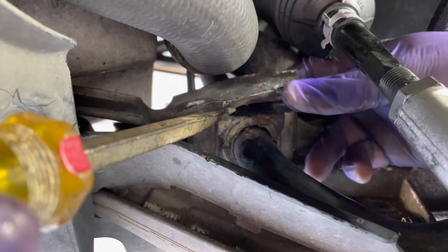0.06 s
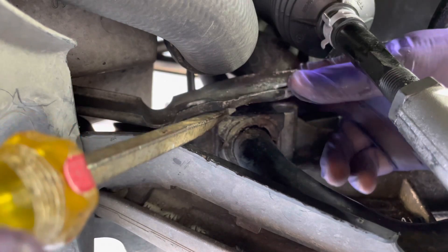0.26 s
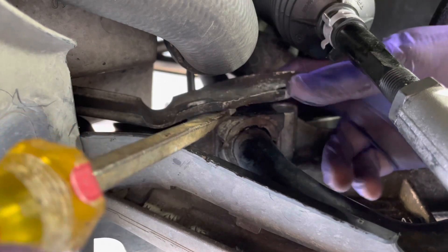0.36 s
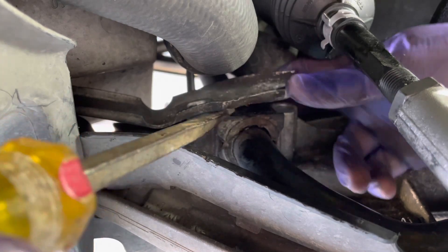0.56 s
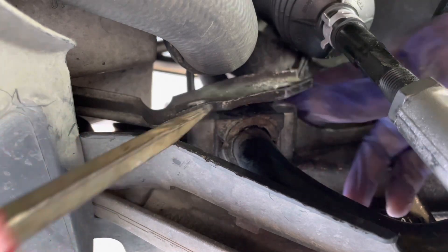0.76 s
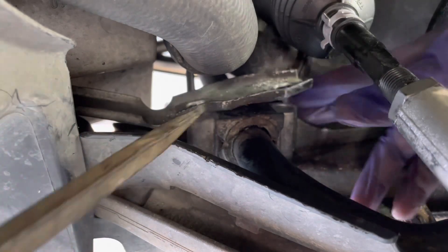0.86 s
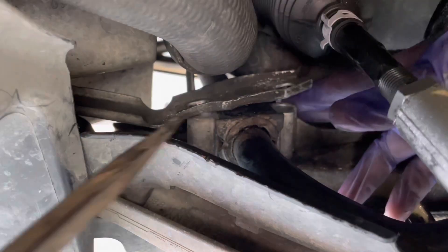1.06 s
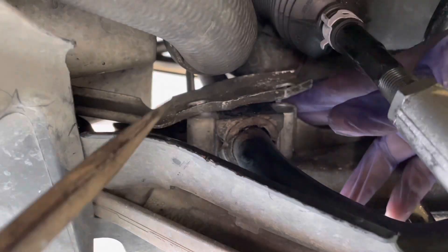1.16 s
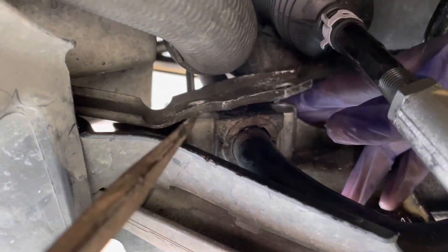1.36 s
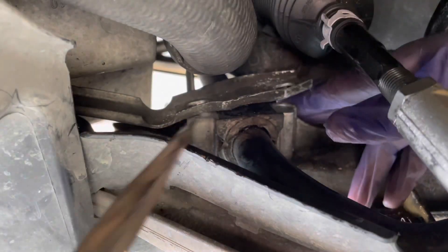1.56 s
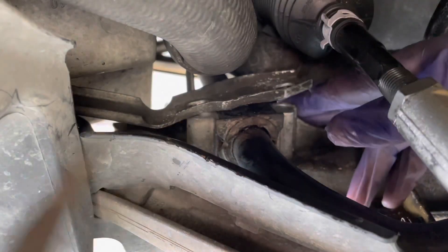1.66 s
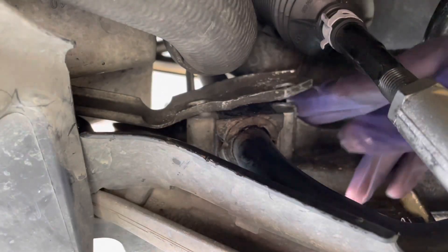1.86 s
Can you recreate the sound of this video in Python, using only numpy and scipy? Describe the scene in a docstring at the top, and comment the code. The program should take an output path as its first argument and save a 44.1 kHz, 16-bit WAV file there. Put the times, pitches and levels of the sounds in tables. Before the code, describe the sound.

A screwdriver levers a steel bar under a car: faint ticks, a cluster of clacks, a short squealing scrape, then a harder ringing knock and quiet rustling, heard close in a garage with handling rumble.

```python
"""Under a car in a garage, a screwdriver levers a steel sway bar against its bracket, close to the microphone.
The tip ticks and pings as it seats, slips with damped clacks of filtered noise, and knocks ring the bar's modes.
It scrapes along the bar: random jerks excite the blade's resonances under a wavering squeal, with an edge hiss.
The suspension thuds in sagging low tones; grit and a gloved hand rustle as showers of tiny impulses.
The shaken microphone rumbles over quiet room noise, and the garage answers with a faint noise-like tail."""
import sys
import numpy as np
from scipy import signal
from scipy.fft import rfft, irfft, next_fast_len
from scipy.io import wavfile
from scipy.ndimage import map_coordinates

SR = 44100
rng = np.random.default_rng(int(sys.argv[2]) if len(sys.argv) > 2 else 0)


def wrap_up_sound(samples):
    """Save the sound to the file named by the first command line argument, as 16-bit audio."""
    columns = np.atleast_2d(samples).T
    # keep every value between -1 and 1, then stretch to whole-number steps
    tamed = np.clip(columns, -1, 1)
    steps = np.round(tamed * 32767).astype(np.int16)
    wavfile.write(sys.argv[1], SR, steps)


N = 83790  # length in samples


def amp(db):
    """Decibels to gain."""
    return 10 ** (np.asarray(db) / 20)


def unit(x):
    """x at rms 1."""
    return x / np.sqrt(np.mean(x ** 2) + 1e-20)


def along(points, hz):
    """Values at hz from (Hz, value) points, interpolated on a log frequency axis."""
    f, v = np.transpose(points)
    return np.interp(np.log(hz + 1), np.log(f + 1), v)


def curves(rows):
    """One value per sample for each column after the time; the end values hold."""
    s, *cols = np.transpose(rows)
    return [np.interp(np.arange(N) / SR, s, c) for c in cols]


def wobble(rate):
    """A smooth random curve, rate knots a second."""
    knots = rng.standard_normal(N)
    return map_coordinates(knots, [np.arange(N) * rate / SR], mode="mirror")


def filtered(x, response):
    """x times a response of frequency."""
    m = next_fast_len(len(x) + 8192)  # padding keeps the filter's tail from wrapping round
    spectrum = rfft(x, m) * response(np.fft.rfftfreq(m, 1 / SR))
    return irfft(spectrum, m)[:len(x)]


def coloured(x, spectrum):
    """x filtered by the given spectrum, at rms 1."""
    return unit(filtered(x, lambda hz: amp(along(spectrum, hz))))


def dying(x, t60s):
    """Each frequency of x fades at its own speed, by 60 dB in its t60."""
    hz, t, z = signal.stft(x, SR, nperseg=128)
    fade = amp(-60 * t / along(t60s, hz)[:, None])
    return signal.istft(z * fade, SR)[1][:len(x)]


def slips(rate, spread_db):
    """Irregular tiny impulses of uneven strength and random sign, on average rate a second."""
    happens = rng.random(N) < rate / SR
    strength = amp(spread_db * rng.standard_normal(N).clip(-2, 2))
    return happens * strength * rng.choice([-1, 1], N)


def add(track, s, sound):
    """Mix a sound in at time s."""
    part = track[max(0, round(s * SR)):][:len(sound)]
    part += sound[:len(part)]


def mode(hz, t60):
    """One damped vibration: a sine that decays by 60 dB in t60 seconds."""
    t = np.arange(SR // 2) / SR
    return np.exp(-np.log(1000) * t / t60) * np.sin(2 * np.pi * hz * t)


def room_noise():
    """Steady, low-heavy noise of the garage around the microphone."""
    # room noise spectrum: (frequency [Hz], relative level [dB])
    floor_colour = [(24, -37), (40, 4.5), (317, -17.5), (650, -26), (1310, -29), (2270, -43), (15500, -54)]
    floor_db = -55
    return amp(floor_db) * coloured(rng.standard_normal(N), floor_colour)


def microphone_shake():
    """Handling of the microphone moves it bodily: very low noise whose level swells and sinks."""
    # shake over time: (time [s], level [dB])
    shake = [(0, -43.5), (.25, -40.5), (.35, -26), (.48, -26.5), (.68, -31), (.95, -39), (1.2, -45),
             (1.45, -40), (1.9, -47)]
    # shake spectrum: (frequency [Hz], relative level [dB])
    shake_colour = [(3, -10.5), (11, -4.5), (20, -16.5), (35, -22), (60, -38), (130, -43.5)]
    top_hz = 160
    noise = coloured(rng.standard_normal(N), shake_colour)
    rumble = filtered(noise, lambda hz: 1 / (1 + (hz / top_hz) ** 8))
    return amp(curves(shake)[0]) * rumble


def glove():
    """Glove and sleeve brush over the parts: a dense shower of tiny slips of the fabric."""
    # rubbing over time: (time [s], level [dB])
    rub = [(0, -84), (.15, -69.5), (.22, -77), (.33, -66.5), (.465, -70.5), (.51, -63), (.56, -65),
           (.66, -60), (.8, -70), (.88, -52.5), (.95, -59.5), (1.17, -62), (1.25, -75), (1.35, -71.5),
           (1.395, -62), (1.44, -79), (1.63, -65.5), (1.8, -60.5), (1.9, -60.5)]
    # fabric spectrum: (frequency [Hz], relative level [dB])
    glove_colour = [(100, -1.5), (350, 17), (700, -1.5), (1200, 3.5), (3000, -3), (6500, -4.5),
                    (10000, -12), (16000, -20.5)]
    level_db = curves(rub)[0] + 1.0 * wobble(40)
    return amp(level_db) * coloured(slips(12000, spread_db=2.5), glove_colour)


def grinding():
    """Grit grinds under the loaded bar: sparser slips, heavy in the bass."""
    # grinding over time: (time [s], level [dB])
    grind = [(.66, -65), (.70, -38.5), (.745, -43.5), (.78, -47.5), (.97, -52.5), (1.04, -45.5),
             (1.12, -47.5), (1.17, -51.5), (1.23, -63.5), (1.75, -76), (1.81, -58), (1.9, -53.5)]
    # grit spectrum: (frequency [Hz], relative level [dB])
    grit_colour = [(40, -20), (100, 10.5), (350, -4), (700, -9.5), (1200, -12.5), (3000, -26),
                   (5500, -29.5), (9000, -39), (16000, -79)]
    level_db = curves(grind)[0] + 1.4 * wobble(70.1)
    return amp(level_db) * coloured(slips(700, spread_db=2.0), grit_colour)


def contacts():
    """Metal contacts give much the same damped clack, coloured by touched spot, weight and sharpness."""
    # contacts: (time [s], level before shaping [dB], bass weight [dB], treble weight [dB], spot resonance [Hz])
    touches = [(.254, -50.5, 10.5, -0.5, 1300), (0.353, -40, -4.5, -10.5, 2870),
               (0.369, -45, -12, -5.5, 4260), (0.382, -42, -2.5, -6.5, 507), (0.669, -56, -13, 12.5, 6340),
               (0.682, -49, -6, -15, 2390), (0.6902, -38.5, 9, 12, 2640), (0.693, -33.5, 6, -18, 1890),
               (0.7068, -46, 3, 10, 3680), (.72, -41.5, 6, 0, 980), (0.728, -46, 2, 6, 3260),
               (0.74, -51, 13, -13, 3365), (0.861, -57, -16, 18, 5160), (0.918, -40.5, 6.5, 5.5, 557),
               (.957, -33.5, 1.5, -15, 3900), (0.993, -47, 4, -26, 2300), (1.0603, -31, 8.5, 11, 2250),
               (1.0634, -26, 1, -14, 1340), (1.0735, -28.5, -15, -1.5, 1400), (1.111, -44, 12.5, -30, 1210),
               (1.132, -44.5, 0, -6, 2460), (1.138, -46, 0.5, -19, 1180), (1.387, -52.5, -2, -1.5, 814),
               (1.801, -51, 11, -24, 253), (1.852, -52, 12, -15, 909.6), (1.893, -47.5, -1, -9, 1070)]
    # clack spectrum before weighting: (frequency [Hz], relative level [dB])
    clack_colour = [(40, -9.5), (120, 2), (270, 5.5), (400, 1.5), (620, -6.5), (1100, -2.5), (1900, -7),
                    (3200, -10), (5500, -14.5), (8500, -23.5), (12000, -33), (16000, -46)]
    # clack decay: (frequency [Hz], t60 [s])
    clack_t60 = [(100, 0.02), (400, 0.12), (1500, 0.05), (5000, 0.068), (12000, 0.059)]
    attack_s, bass_hz, treble_hz = 0.00058, 540, 4040
    spot_db, spot_octaves = 9, .17  # how strongly and widely the touched spot resonates
    alike = 0.7  # share of the ring's power that all contacts have in common
    out, t = np.zeros(N), np.arange(SR // 2) / SR
    common = rng.standard_normal(len(t))
    for s, db, bass_db, treble_db, spot_hz in touches:
        def touch(hz):
            """Bass and treble shelves, and a bell at the touched spot's resonance."""
            bass = bass_db / (1 + (hz / bass_hz) ** 4)
            treble = treble_db * (1 - 1 / (1 + (hz / treble_hz) ** 4))
            octaves = np.log2((hz + 1) / spot_hz)
            spot = spot_db * np.exp(-(octaves / spot_octaves) ** 2)
            return amp(bass + treble + spot)

        ring = np.sqrt(alike) * common + np.sqrt(1 - alike) * rng.standard_normal(len(t))
        clack = filtered(coloured(ring, clack_colour), touch)
        onset = 1 - np.exp(-t / attack_s)
        add(out, s, amp(db) * onset * dying(clack, clack_t60))
    return out


def taps():
    """A light touch gives one short ping, whose pitch depends on where the blade rests."""
    # light taps: (time [s], level before onset and decay [dB], pitch [Hz])
    pings = [(0.254, -47, 1278), (.426, -51.5, 1320), (0.979, -35.5, 1115), (1.133, -40, 1126),
             (1.378, -50.5, 1523)]
    t60_s, attack_s = 0.043, 0.001656
    out, t = np.zeros(N), np.arange(SR // 2) / SR
    onset = 1 - np.exp(-t / attack_s)
    for s, db, hz in pings:
        add(out, s, amp(db) * onset * mode(hz, t60_s))
    return out


def thuds():
    """Short, low, wavering groans that sag in pitch as the bar shifts in its rubber mount."""
    # shifts of the bar: (time [s], level [dB], middle pitch [Hz], length [s])
    shifts = [(0.314, -39, 84.64, 0.038), (0.692, -41.5, 175.5, 0.092), (0.699, -41.5, 358.2, 0.065),
              (0.73, -48, 225, .042), (0.916, -49, 164.4, 0.054), (0.912, -42, 83.37, 0.14),
              (1.086, -43, 84.2, 0.095)]
    waver, sag = .05, .12  # shares of the pitch
    out, t = np.zeros(N), np.arange(N) / SR
    for s, db, hz, length in shifts:
        progress = np.clip((t - s) / length, 0, 1)
        swell = np.sqrt(abs(2 * np.sin(np.pi * progress)))  # silent before and after
        pitch = hz * (1 + sag * (.5 - progress) + waver * wobble(90))
        out += amp(db) * swell * np.sin(2 * np.pi * np.cumsum(pitch) / SR)
    return out


def edge():
    """The blade's edge hisses thinly as it drags: tiny slips in a narrow treble band."""
    # dragging over time: (time [s], level [dB])
    drag = [(.65, -100), (.75, -63), (.81, -60.5), (.9, -70), (1, -100)]
    # hiss spectrum: (frequency [Hz], relative level [dB])
    edge_colour = [(5200, -25), (5950, 2), (6600, -8), (7600, -33.5)]
    return amp(curves(drag)[0]) * coloured(slips(5400, spread_db=-6.0), edge_colour)


def bar():
    """Heavy knocks ring the modes of bar and bracket, damped by the rubber mount and the hand."""
    # heavy knocks: (time [s], level before mode levels [dB])
    knocks = [(.692, -34), (1.0622, -25.5), (1.131, -42)]
    # modes of bar and bracket: (frequency [Hz], relative level [dB], t60 [s])
    steel = [(184.3, -13, 0.29), (269.7, -3, 0.089), (362.7, -12.5, 0.22), (465, -19, 0.087),
             (950, -5, 0.019), (1146, -1, 0.088), (1216, -13, 0.087), (1872, -15, 0.082),
             (2150, -11, 0.079), (2708, -17.5, 0.11), (3328, -11, 0.057), (4900, -14, 0.034)]
    out = np.zeros(N)
    for s, db in knocks:
        for hz, level, t60 in steel:
            uneven_db = rng.normal(0, 1)  # no two knocks excite a mode quite alike
            add(out, s, amp(db + level + uneven_db) * mode(hz, t60))
    return out


def scrape():
    """The tip sticks and slips: tiny random jerks ring the blade, and a rough squeal wavers in pitch."""
    # sliding tip: (time [s], level before the rasp and squeal gains [dB], squeal pitch [Hz])
    slide = [(.755, -66, 1880), (.770, -42, 1907), (.789, -39, 1893), (.807, -38, 2336), (.82, -41, 2186),
             (.842, -41, 2170), (.87, -46, 2290), (.9, -47, 2233), (.965, -59, 2300), (.997, -48.5, 2300),
             (1.015, -58.5, 2300), (1.06, -56, 2280)]
    # blade resonances: (frequency [Hz], width [Hz], relative level [dB])
    scrape_modes = [(980, 140, -1.5), (1356, 81, 3), (1570, 70, -13.5), (1885, 31, 2), (2153, 114, -1),
                    (2373, 90, 0), (4550, 540, -21.5)]
    slips_per_s, slip_spread_db = 1400, -0.5
    rasp_db, squeal_db, chatter_db = -3, -5.5, 1.5
    squeal_jitter = 0.0309  # share of the pitch

    def blade(f):
        """Sum of the blade's resonances, with alternating sign."""
        total = 0
        for k, (centre, width, db) in enumerate(scrape_modes):
            damping = 1j * f * width
            total = total + (-1) ** k * amp(db) * damping / (centre ** 2 - f ** 2 + damping)
        return total

    level_db, pitch = curves(slide)
    rasp = unit(filtered(slips(slips_per_s, slip_spread_db), blade))
    rough_pitch = pitch * (1 + squeal_jitter * wobble(700))
    squeal = unit(np.sin(2 * np.pi * np.cumsum(rough_pitch) / SR))
    t = np.arange(N) / SR
    touching = (t > slide[0][0]) & (t < slide[-1][0])
    level = touching * amp(level_db + chatter_db * wobble(140))
    return level * (amp(rasp_db) * rasp + amp(squeal_db) * squeal)


def garage(work):
    """The garage's faint answer: the work convolved with noise that dies at its own speed per frequency."""
    # reverberation: (frequency [Hz], t60 [s])
    garage_t60 = [(150, 0.61), (1500, 0.17), (5000, 0.19), (12000, 0.27)]
    garage_db = -16
    tail = dying(rng.standard_normal(SR // 2), garage_t60)
    return amp(garage_db) * signal.fftconvolve(work, tail / np.linalg.norm(tail))[:N]


def scene():
    """The close work, the garage's answer, and the background at the microphone."""
    background = room_noise() + microphone_shake()
    rubbing = glove() + grinding()
    strikes = contacts() + taps() + thuds() + bar()
    sliding = edge() + scrape()
    work = rubbing + strikes + sliding
    return (work + garage(work) + background)[None]


def record(dry):
    """The recorder keeps nothing above its band limit."""
    top_hz = 15850
    return np.array([filtered(x, lambda hz: hz < top_hz) for x in dry])


dry = scene()
out = record(dry)
wrap_up_sound(out)
```